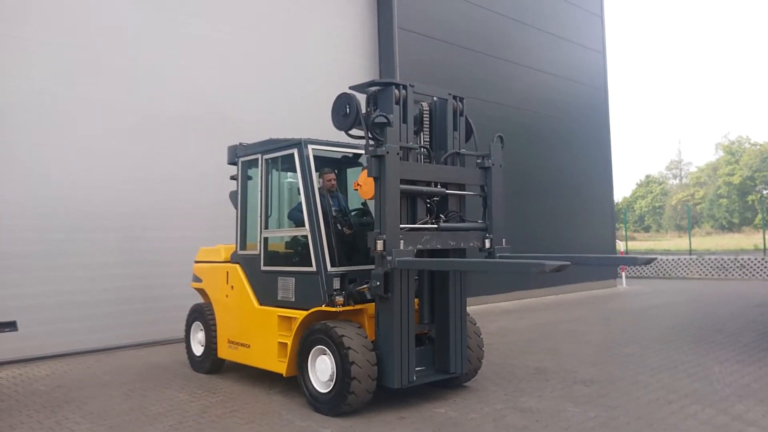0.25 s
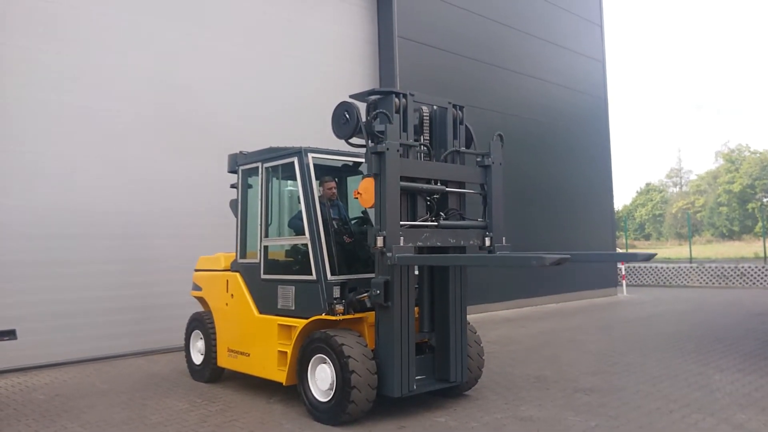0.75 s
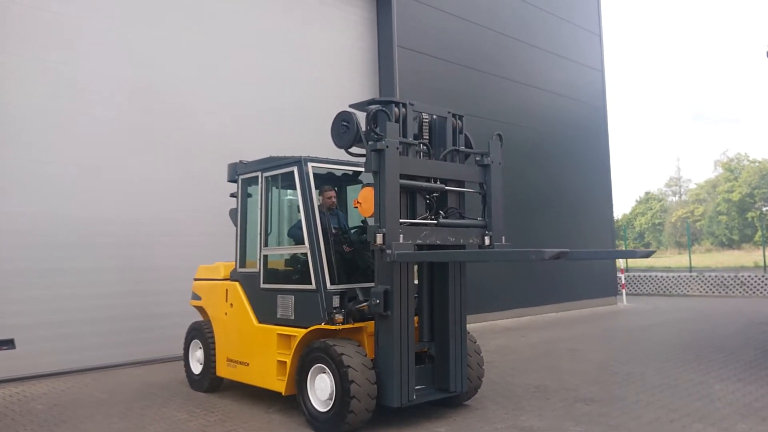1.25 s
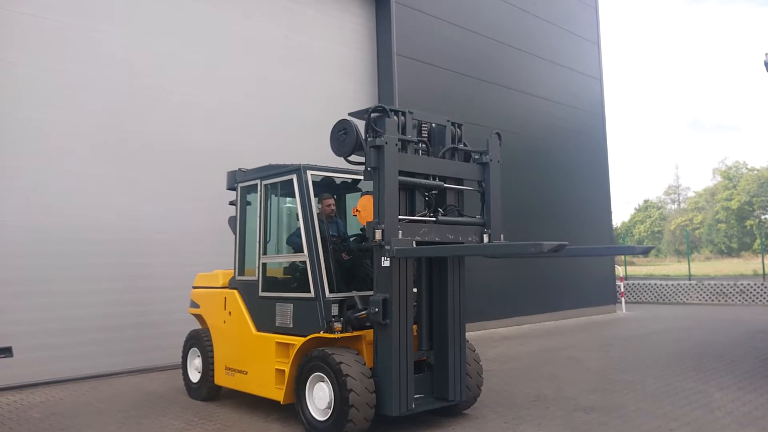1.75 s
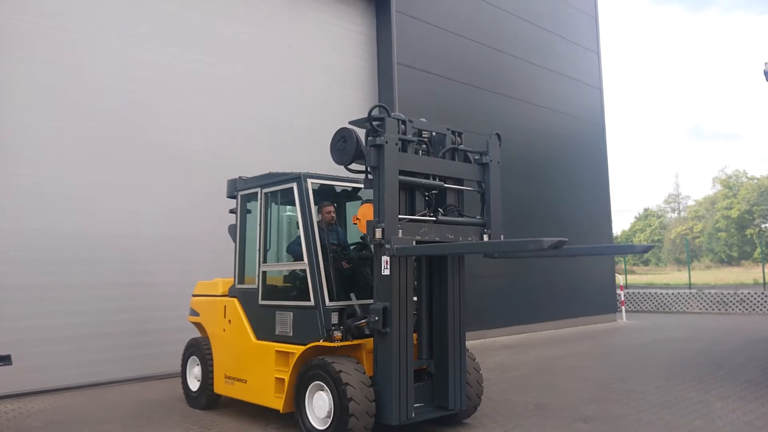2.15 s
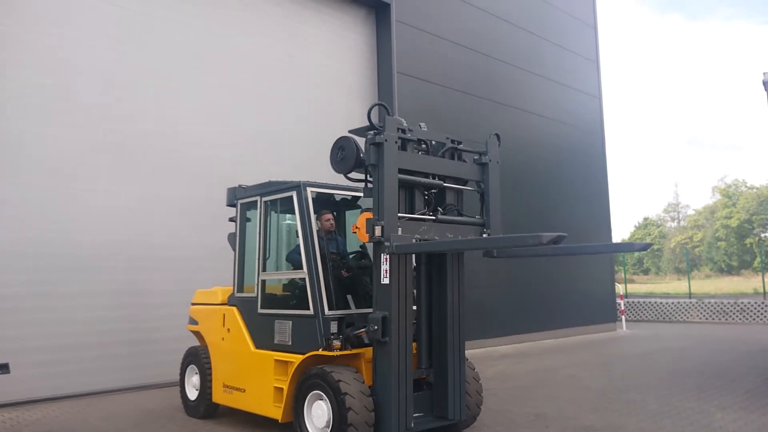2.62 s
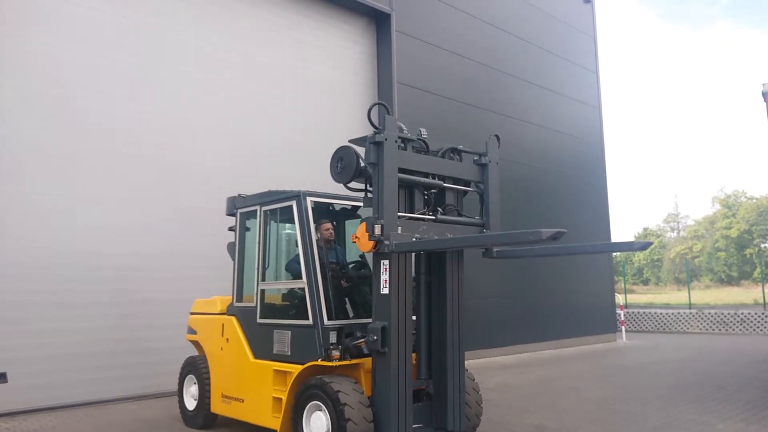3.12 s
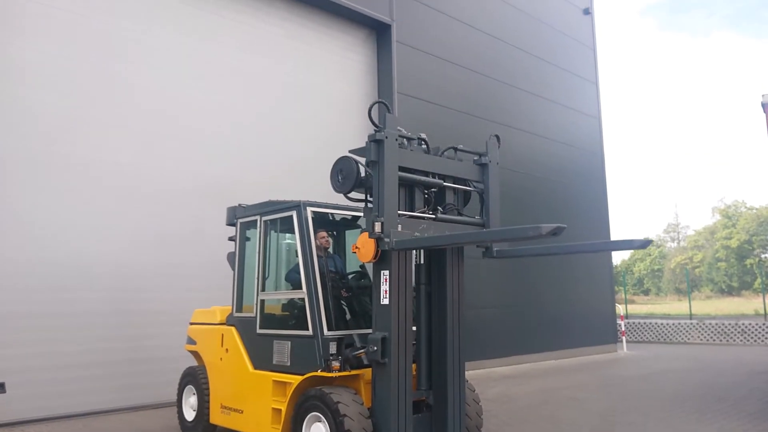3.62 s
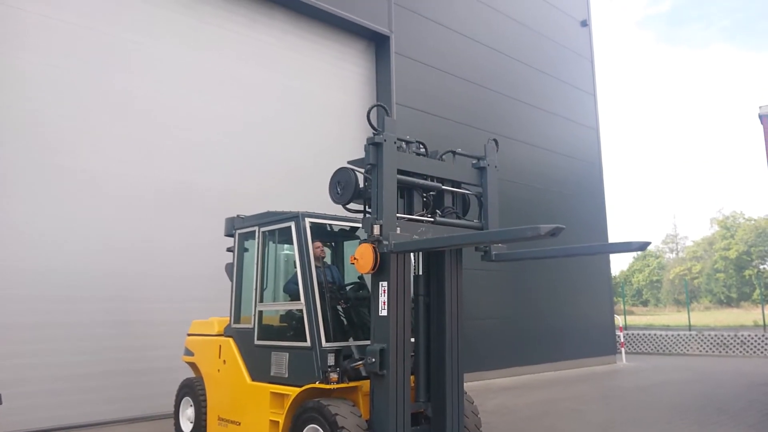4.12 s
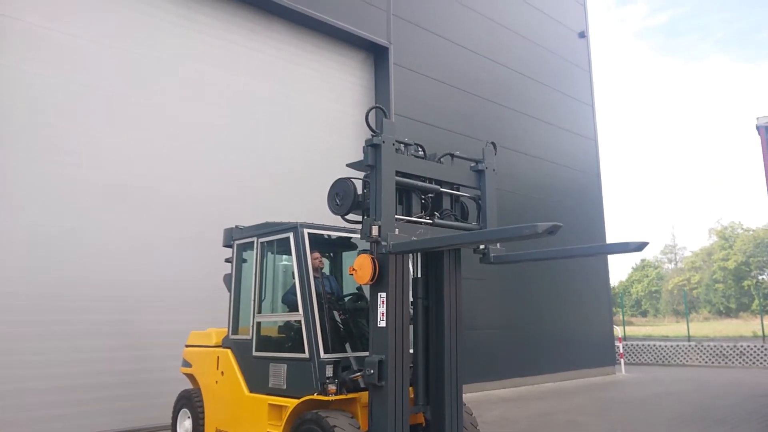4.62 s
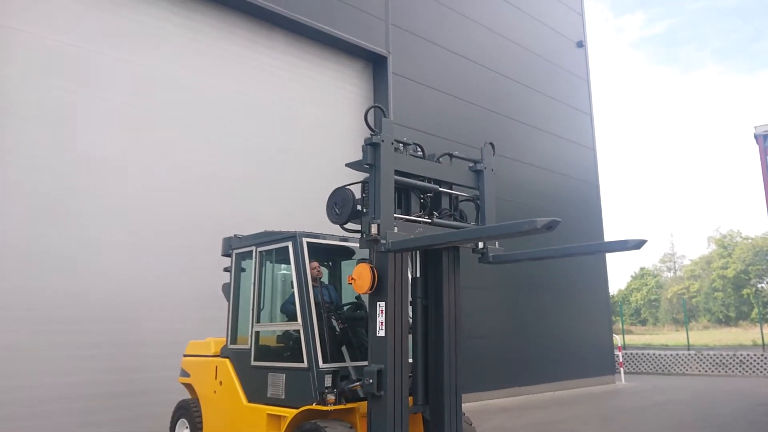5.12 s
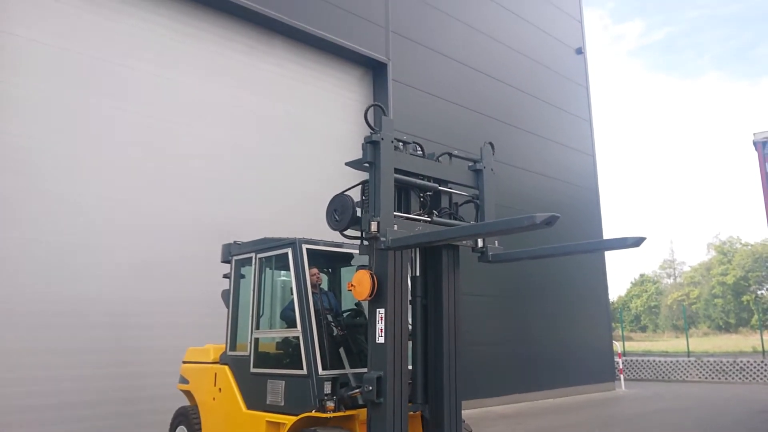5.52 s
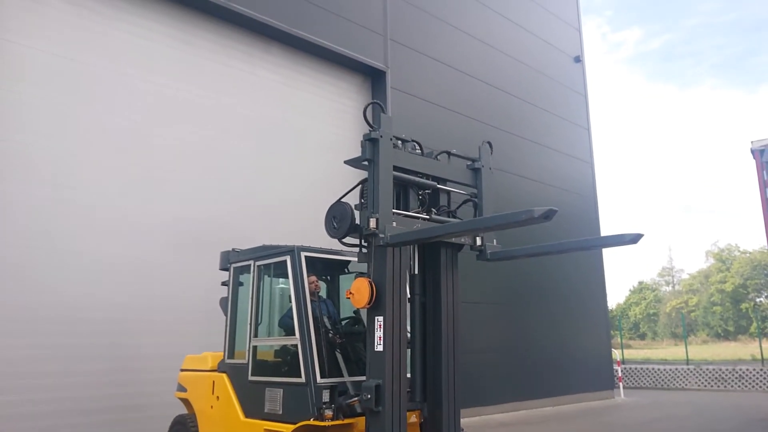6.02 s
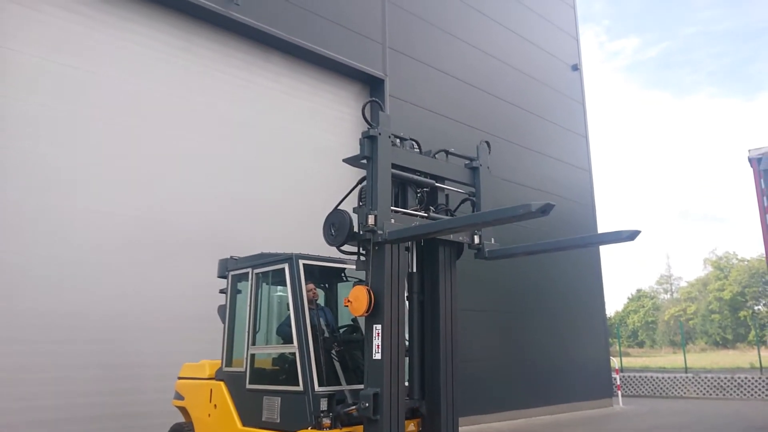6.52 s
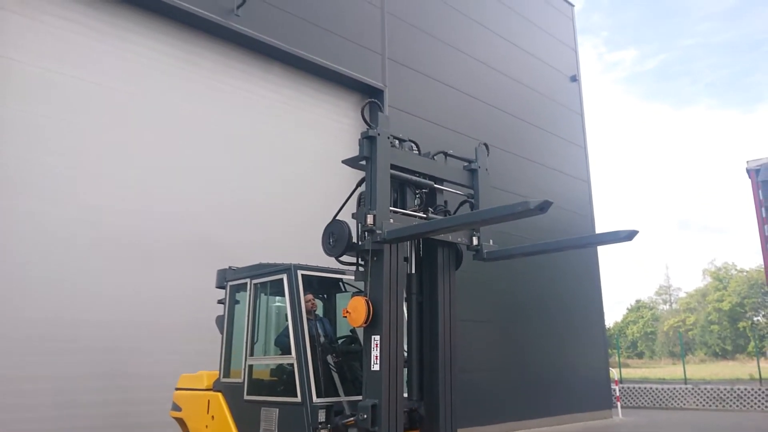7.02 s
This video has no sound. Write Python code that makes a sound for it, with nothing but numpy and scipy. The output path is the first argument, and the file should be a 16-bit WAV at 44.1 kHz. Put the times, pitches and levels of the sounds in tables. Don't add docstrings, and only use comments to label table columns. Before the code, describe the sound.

Outdoors beside a metal-walled warehouse, a diesel forklift idles steadily a few metres from a stereo microphone, humming, clattering and hissing with a pump whine. Midway the lift engages: the engine sags, the whine surges, the mast clunks and rattles. It labours on slightly lower, with soft chain thuds and low wind rumble.

```python
import sys
import numpy as np
from scipy import signal
from scipy.fft import rfft, irfft, next_fast_len
from scipy.io import wavfile
from scipy.ndimage import uniform_filter1d

SR = 44100
rng = np.random.default_rng(int(sys.argv[2]) if len(sys.argv) > 2 else 0)


def gain_from_db(level_db):
    decades = np.asarray(level_db, float) / 20
    return 10 ** decades


def inscribe(sig):
    pcm = np.round(np.clip(np.atleast_2d(sig).T, -1, 1) * 32767)
    wavfile.write(sys.argv[1], SR, pcm.astype(np.int16))


N = 320166
TIME = np.arange(N) / SR

# (time [s], speed [turns per s])
CRANK_SPEED = [(0.0, 13.145), (2.9, 13.125), (3.3, 13.05), (3.55, 12.99), (3.7, 13.15), (3.78, 12.98),
               (3.85, 12.29), (4.0, 12.32), (4.05, 12.79), (4.1, 13.16), (4.3, 13.09), (4.4, 12.87),
               (4.48, 12.6), (4.6, 12.6), (4.7, 12.76), (4.8, 12.82), (5.0, 12.73), (7.26, 12.735)]
# (time [s], load [0-1])
PUMP_LOAD = [
    (0, 0.09),
    (3.7, 0),
    (3.85, 0.96),
    (4.0, 0.64),
    (4.08, 0.3),
    (4.3, 0.68),
    (4.5, 0.9),
    (7.26, 1),
]

# (crank order [per turn], light load [dB], full load [dB])
EXHAUST_ORDERS = [(3, -39, -39), (4.5, -54, -47), (5, -47, -42), (6, -29, -30), (6.5, -51, -58),
                  (7, -47, -44), (7.5, -50, -51), (8, -44, -41), (9, -49, -48), (11, -49, -43),
                  (12, -43, -41), (12.5, -50, -59), (13, -46, -50), (14, -45, -42), (14.5, -50, -50),
                  (15, -48, -48), (17, -55, -51), (18, -48, -48), (21, -62, -47), (24, -41, -39)]
# (crank order [per turn], left minus right [dB], left leads [rad])
EXHAUST_SIDE = [(3, -3, .5), (6, -2.5, .4), (12, -1.3, .33), (18, -1, .3), (24, -3, .4)]
# (crank order [per turn], light left [dB], light right [dB], full left [dB], full right [dB])
GEAR_ORDERS = [(30, -58, -51, -54, -48), (33, -61, -55, -55, -46), (34, -57, -47, -59, -52),
               (57, -53, -54, -49, -52), (60, -49, -48, -63, -66), (71, -72, -66, -65, -50),
               (72, -59, -54, -59, -67), (73.5, -71, -60, -60, -49), (75, -55, -45, -60, -54),
               (77, -65, -83, -57, -51), (110, -56, -64, -63, -67), (111.5, -56, -65, -64, -64),
               (112, -53, -59, -72, -63), (114, -50, -54, -60, -63)]
GEAR_LEAD = [(30, .5), (34, 1.2), (57, .3), (72, 1.2), (112, 2.8)]
OPPOSED_ORDERS = (14, 21)
AHEAD, BEHIND = (5, 8, 12, 14.5, 18), (6.5, 7, 9, 15, 17, 24)

# (pitch [Hz], left [dB per Hz], right [dB per Hz], likeness of sides [0-1], left leads [rad])
BLOCK_NOISE = [(30, -64, -64, 0.97, 0.3), (50, -67, -55, 0.7, 0.58), (90, -62.5, -55, 0.93, 0.77),
               (137, -63.5, -58, 1, 0.36), (185, -61, -62, 0.92, 0.31), (244, -66.5, -63.5, 1, 0.3),
               (402, -70, -65, 0.77, 0.4), (465, -72, -61.5, 0.3, 0.79), (515, -73, -75, 0.92, 2.2),
               (728, -66, -68, 0.9, 0.14), (1000, -73.5, -66, 0.62, 1.3), (1280, -74.5, -72.5, 0.99, 2.35),
               (1590, -71.5, -73.5, 0.32, 1.68), (1950, -75, -68.5, 0.26, 6.7)]
# (pitch [Hz], left [dB per Hz], right [dB per Hz], likeness of sides [0-1], left leads [rad])
FAN_HISS = [(2000, -74, -68, .29, 4.9), (2386, -68, -68.5, 1, 6.7), (2675, -76.5, -73.5, 0.35, 10.4),
            (3570, -79, -73.5, 0.52, 20.1), (4610, -77, -79.5, 0.43, 21.43),
            (5170, -78.5, -79, 0.079, 29.2), (6010, -82, -84.5, 0.13, 35.5), (6910, -84, -88, 0.083, 39.8),
            (8080, -102, -102, 0.15, 40.9), (8240, -94, -93.5, 0.2, 43.7), (9800, -100.5, -91, .06, 40.3),
            (11900, -95, -93, .06, 48.6), (14500, -88, -92, .19, 56.1), (15600, -95, -94, .1, 48)]
# (pitch [Hz], new part [dB], returning part [dB])
CYCLE_SHARE = [(60, -4, -6), (200, -6, -6), (330, -4, -2), (1100, -4.5, -2), (1600, -2.2, -4),
               (2300, -1.1, -6.5), (3200, -.5, -10), (5000, 0, -25)]
CYLINDER_KNOCK = [1.7, 7.5, -1, 14, 5, -7]
# (pitch [Hz], time to fade by 60 dB [s], light left [dB], light right [dB],
# full left [dB], full right [dB])
COVER_RINGS = [(1900, .012, -66, -56, -64, -50), (3180, .012, -72, -64, -62, -52),
               (3380, .05, -55, -55, -66, -61), (3500, .06, -54, -55, -65, -61),
               (3625, .05, -57, -57, -68, -64), (4220, .035, -58, -60, -56, -58),
               (4915, .035, -52, -60, -57, -59), (5600, .015, -57, -66, -62, -64)]

CASING_SPEED = [12.3, 12.62, 12.75, 12.88, 13.0, 13.14]
# (tooth tone left [dB], right [dB], octave [dB], twelfth [dB])
CASING_LEVEL = [(-46, -31, -33.5, -59), (-45, -42, -36.5, -53), (-48, -34.5, -43.5, -50.5),
                (-44, -32.5, -41, -41), (-41.5, -37, -44.5, -41.5), (-36, -36, -50, -45)]
# (time [s], half width [s], tooth tone [dB], octave [dB])
SURGES = [
    (3.79, .04, -3, -8),
    (3.92, .08, 5, 2),
    (4.04, .035, -4, -8),
    (4.52, .06, -2, 4),
    (4.78, .14, 1, -5),
    (5.06, .14, -1, 7),
    (5.3, .06, 1, 5),
    (5.55, .12, -7, 8),
    (5.9, .14, -5, 4),
    (6.75, .55, -2, 7),
]

# (time [s], peak [dB], brightness [dB per octave])
MAST_BLOWS = [
    (4.114, -14.5, -2.5),
    (4.126, -19, 0),
    (4.172, -18.5, 4.5),
    (4.199, -19, -.5),
]
# (pitch [Hz], level [dB], time to fade by 60 dB [s])
MAST_RINGS = [(172, -10, .08), (248, -11, .07), (298, -4, .1), (350, 1, .24), (431, -5, .07),
              (600, -10, .05), (760, -4.5, .1), (877, -8, .05), (1050, -9, .05), (1450, -16, .04),
              (1940, -17, .02), (2270, -9, .035), (2900, -24, .015)]
# (time [s], peak [dB], pitch [Hz], half width [s])
CHAIN_THUDS = [
    (5.411, -16.5, 70, 0.019),
    (5.449, -19, 60, 0.016),
    (5.485, -33, 75, 0.014),
]
# (time [s], half width [s], level [dB])
GUSTS = [
    (2.0, .25, -52),
    (4.05, .15, -33),
    (5.45, .1, -33),
    (6.35, .1, -42),
    (7.26, .5, -46),
]


def engine_hum(crank, load, boom_db):
    boom, buzz = 0, 0
    for order, left, right, left_full, right_full, lead in crank_orders():
        rough = min(order / 60, 1)
        start = .5 * (order in OPPOSED_ORDERS) + .09 * (order == 3) + .03 * rng.standard_normal()
        start += .22 * ((order in AHEAD) - (order in BEHIND))
        gear_db = 2.0 * rough ** 2
        left_db = left + load * (left_full - left) + gear_db
        right_db = right + load * (right_full - right) + gear_db
        line = tone(order * crank + start, left_db, right_db, lead,
                    sway_db=.4 + 1.6 * rough, sway_rad=.04 + .3 * rough, rate=7)
        if order <= 6 or order > 40:
            boom = boom + line
        else:
            buzz = buzz + line
    uneven = 1 + .1 * np.cos(np.pi * crank + .4)
    return gain_from_db(boom_db) * boom + gain_from_db(-0.73) * uneven * buzz


def crank_orders():
    at, side_db, lead = np.transpose(EXHAUST_SIDE)
    rows = []
    for order, light, full in EXHAUST_ORDERS:
        side = np.interp(order, at, side_db)
        rows.append((order, light + side, light, full + side, full, np.interp(order, at, lead)))
    for row in GEAR_ORDERS:
        rows.append((*row, np.interp(row[0], *np.transpose(GEAR_LEAD))))
    return rows


def fuel_db(speed):
    most_db, per_hz_s, lag_s = 4, .25, .1
    keep = np.exp(-1 / (lag_s * SR))
    speeding_up = signal.lfilter([1 - keep], [1, -keep], np.gradient(speed) * SR)
    return most_db * np.tanh(per_hz_s * speeding_up)


def clatter(crank, load):
    size = next_fast_len(N)
    octave = np.log2(np.maximum(np.fft.rfftfreq(size, 1 / SR), 1))
    sides = clatter_noise(crank, load, size, octave)
    firing = 3 * crank
    cylinder_db = np.array(CYLINDER_KNOCK)[firing.astype(int) % len(CYLINDER_KNOCK)]
    knock = np.exp(-(2 * firing % 1) / 0.21) - .33
    puff = np.cos(2 * np.pi * firing + .7)
    breath_db = 1.14 * (1 - 0.67 * load) * np.cos(np.pi * crank + .5)
    spit_db = 4.5 * bump(3.995, .03)
    turn_db = np.outer([2.5, -.4], TIME / TIME[-1] - .5)
    out, swell = 0, walk(3.42)
    for centre in np.arange(4.5, 14.6):
        band = irfft(sides * np.clip(1 - abs(octave - centre), 0, 1), size)[:, :N]
        high = np.clip((centre - 12.4) / 2.0, 0, 1)
        middle = np.clip((centre - 8.2) / 1.4, 0, 1) * np.clip((12.6 - centre) / 7.3, .2, 1) * (1 - high)
        beat_db = middle * (3.3 * knock + 0.27 * cylinder_db) + high * (1.3 * puff + breath_db)
        load_db = 2.34 * load * np.exp(-((centre - 8.6) / 2.0) ** 2)
        drift_db = 1.4 * (middle + high) * walk(14) + high * (0.41 * swell + turn_db)
        drift_db = drift_db + spit_db * (centre > 12)
        calm_db = -4 * (1 - load) * (centre < 7)
        out = out + band * gain_from_db(uniform_filter1d(beat_db, size=40) + load_db + drift_db + calm_db)
    return out * gain_from_db(1.0)


def clatter_noise(crank, load, size, octave):
    hz, left_db, right_db, like, lead = np.transpose(BLOCK_NOISE + FAN_HISS[1:])

    def read(column):
        return np.interp(octave, np.log2(hz), column)

    at_hz, fresh_db, again_db = np.transpose(CYCLE_SHARE)
    fresh = gain_from_db(np.interp(octave, np.log2(at_hz), fresh_db))
    again = gain_from_db(np.interp(octave, np.log2(at_hz), again_db))
    new_noise = rfft(rng.standard_normal((2, size)))
    returning = rfft(cycle_noise(crank, load), size)
    shared, own = np.sqrt(SR / 2) * (fresh * new_noise + again * returning)
    like = np.clip(read(like), 0, 1)
    left = like * shared + np.sqrt(1 - like ** 2) * own
    left = left * np.exp(1j * read(lead)) * gain_from_db(read(left_db))
    right = shared * gain_from_db(read(right_db))
    return np.array([left, right]) * (octave < np.log2(SR * .36))


def cycle_noise(crank, load):
    unsteady_ms = .12
    steps = SR * 2 // 13
    wander = load * unsteady_ms / 1000 * SR * walk(8)
    place = (crank / 2 * steps + wander) % steps
    patterns = rfft(rng.standard_normal((2, 2, steps)))
    patterns[..., [int(2 * row[0]) for row in crank_orders()]] = 0
    light, full = ([np.interp(place, np.arange(steps), row, period=steps) for row in pair]
                   for pair in irfft(patterns, steps))
    return np.cos(np.pi / 2 * load) * light + np.sin(np.pi / 2 * load) * full


def covers(crank, load):
    out = 0
    for hz, t60, left, right, left_full, right_full in COVER_RINGS:
        beat = np.exp(-(6 * crank % 1) / 0.19)
        tick_db = 1.6 * rng.exponential(size=N // 64 + 1).repeat(64)[:N]
        ticks = rng.standard_normal((2, N)) * beat * gain_from_db(tick_db)
        rings = ring(ticks, hz, t60)
        level_db = np.array([left + load * (left_full - left), right + load * (right_full - right)])
        out = out + rings / rings.std() * gain_from_db(level_db)
    return out


def pump(crank, load, left_db, right_db, octave_db, twelfth_db):
    mesh = 37 * crank
    first = tone(mesh, left_db, right_db, 2.6 - .6 * load, sway_db=.8, sway_rad=.12, rate=12)
    second = tone(2 * mesh, octave_db - 7.5, octave_db, 1.05, sway_db=1.5, sway_rad=.25, rate=12)
    third = tone(3 * mesh, twelfth_db, twelfth_db - 7, 2.7, sway_db=1, sway_rad=.2, rate=12)
    return gain_from_db(0.95) * first + gain_from_db(-0.4) * second + gain_from_db(2.0) * third


def pump_db(speed):
    left, right, octave, twelfth = (np.interp(speed, CASING_SPEED, c) for c in np.transpose(CASING_LEVEL))
    held = np.array([np.exp(-((TIME - s) / width_s) ** 4) for s, width_s, *_ in SURGES])
    tone_db, octave_db = np.transpose(SURGES)[2:] @ held
    return left + tone_db, right + tone_db, octave + octave_db, twelfth


def mast():
    out = np.zeros(N)
    after = np.arange(N // 16)
    for s, peak_db, bright_db in MAST_BLOWS:
        push = rng.standard_normal(len(after)) * np.minimum(after / 160, 1) * np.exp(-after / 220)
        blow = 0
        for hz, db, t60 in MAST_RINGS:
            mode = ring(push, hz, t60)
            blow = blow + gain_from_db(db + bright_db * np.log2(hz / 500)) * mode / abs(mode).max()
        at = int(s * SR)
        out[at:at + len(blow)] += blow / abs(blow).max() * gain_from_db(peak_db)
    for s, peak_db, hz, width_s in CHAIN_THUDS:
        out += gain_from_db(peak_db) * bump(s, width_s) * np.cos(2 * np.pi * hz * (TIME - s))
    return np.array([gain_from_db(-2.5) * np.roll(out, -2), out])


def wind():
    calm_db, breeze_db, breeze_from_s = -57, -52.5, 4.9
    low_band = signal.butter(2, [48., 85.], "band", fs=SR, output="sos")
    rumble = signal.sosfilt(low_band, rng.standard_normal(N))
    breeze = gain_from_db(calm_db) + gain_from_db(breeze_db) * np.clip((TIME - breeze_from_s) / .2, 0, 1)
    gusts = sum(gain_from_db(db) * bump(s, width_s) for s, width_s, db in GUSTS)
    rumble = rumble / rumble.std() * np.maximum(breeze, gusts)
    return np.array([gain_from_db(-2.5) * np.roll(rumble, -35), rumble])


def tone(turns, left_db, right_db, lead, sway_db, sway_rad, rate):
    angle = 2 * np.pi * turns + sway_rad * walk(rate)
    size = np.sqrt(2) * gain_from_db(sway_db * walk(rate))
    return size * np.array([gain_from_db(left_db) * np.cos(angle + lead), gain_from_db(right_db) * np.cos(angle)])


def ring(x, hz, t60):
    pole = np.exp(2j * np.pi * hz / SR - np.log(1000) / (t60 * SR))
    return signal.lfilter([1], [1, -pole], x).imag


def walk(rate):
    held = np.repeat(rng.standard_normal(int(N / SR * rate) + 2), 8)
    slewed = 1.3 * uniform_filter1d(uniform_filter1d(held, size=8), size=8)
    return np.interp(TIME * rate * 8, np.arange(len(held)), slewed)


def bump(s, width_s):
    return np.exp(-((TIME - s) / width_s) ** 2)


def scene():
    speed = np.interp(TIME, *np.transpose(CRANK_SPEED))
    crank = .06 + np.cumsum(speed) / SR
    load = np.clip(np.interp(TIME, *np.transpose(PUMP_LOAD)), 0, 1)
    engine = engine_hum(crank, load, fuel_db(speed)) + clatter(crank, load) + covers(crank, load)
    return engine + pump(crank, load, *pump_db(speed)) + mast() + wind()


def low_pass(x):
    return signal.sosfilt(signal.butter(12, 15750, fs=SR, output="sos"), x)


def record(dry):
    bass_cut = signal.butter(3, 27., "high", fs=SR, output="sos")
    mix = signal.sosfiltfilt(bass_cut, dry)
    return low_pass(mix)


dry = scene()
out = record(dry)
inscribe(out)
```